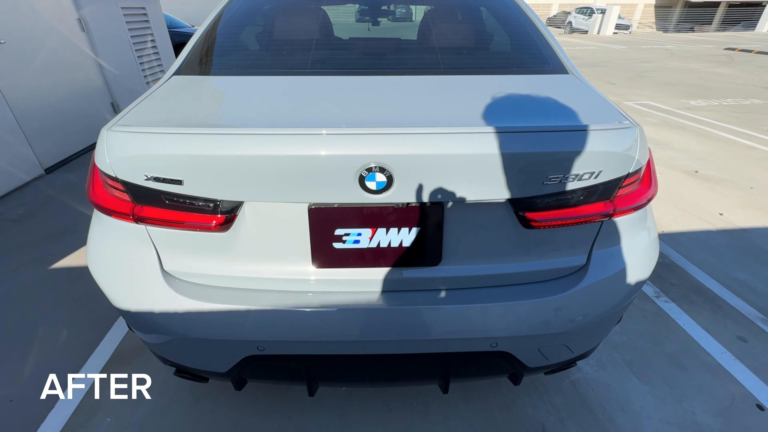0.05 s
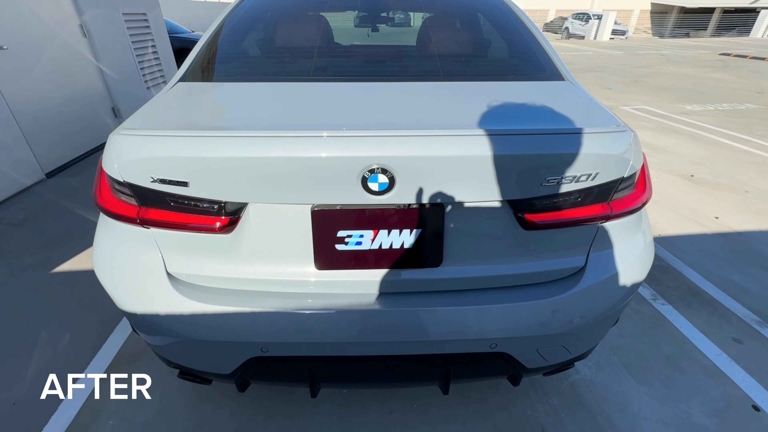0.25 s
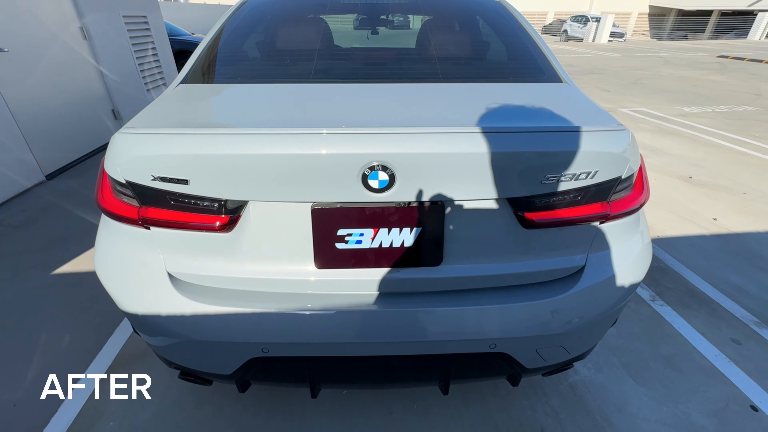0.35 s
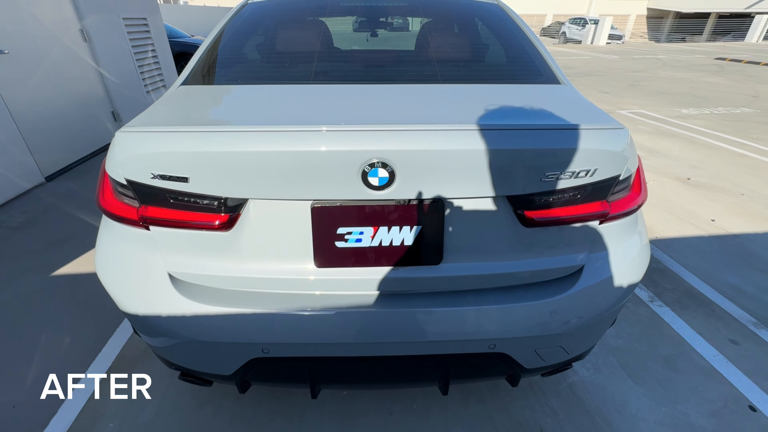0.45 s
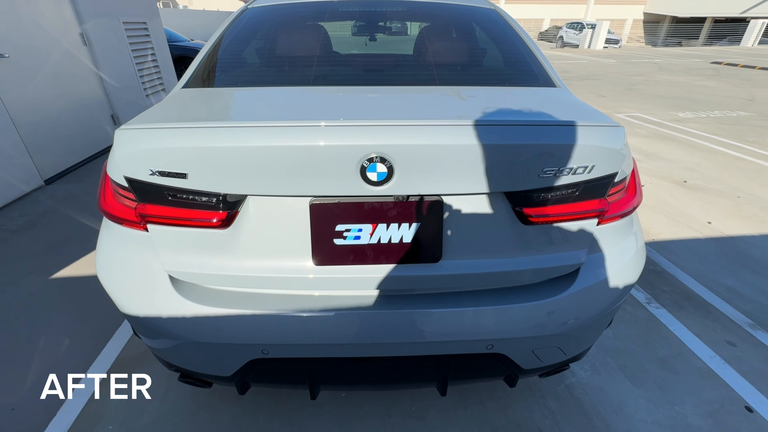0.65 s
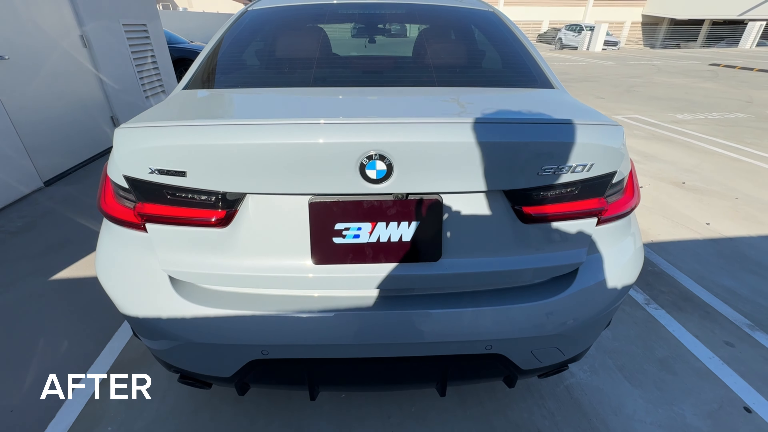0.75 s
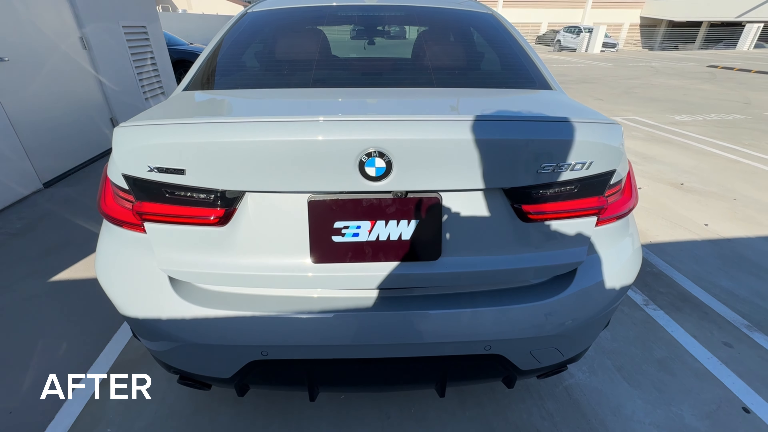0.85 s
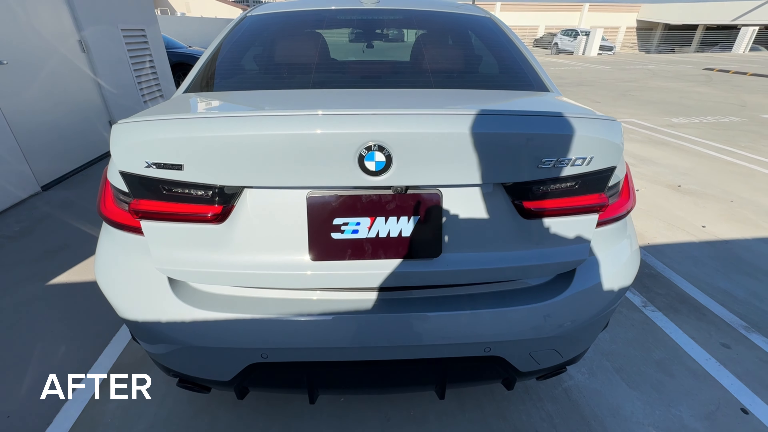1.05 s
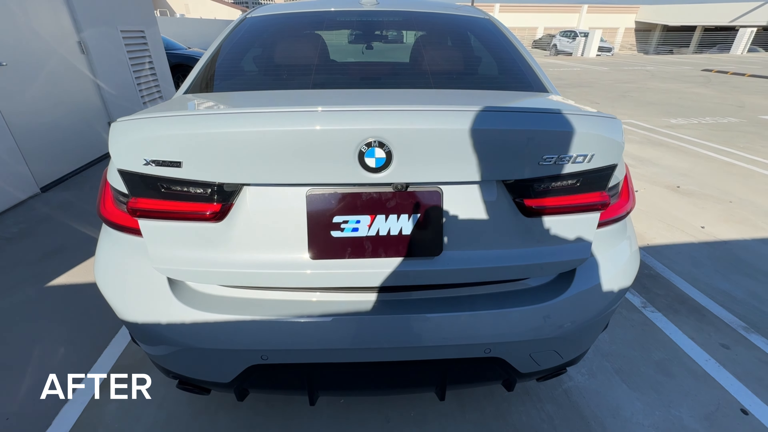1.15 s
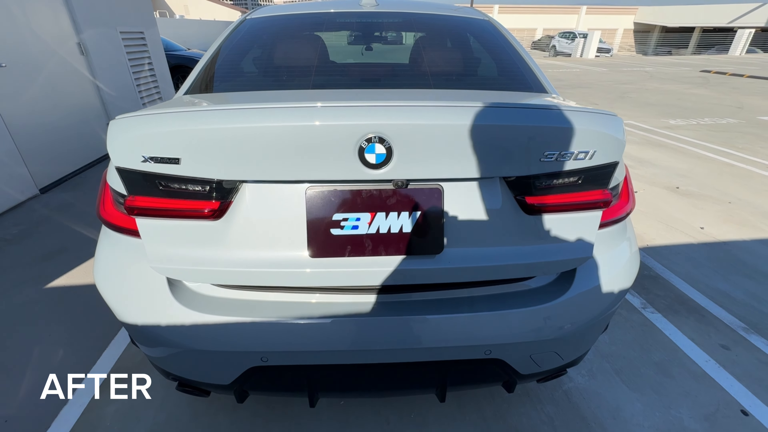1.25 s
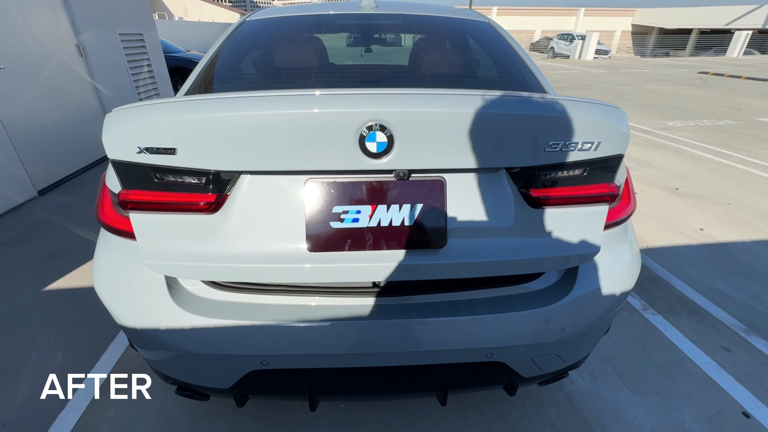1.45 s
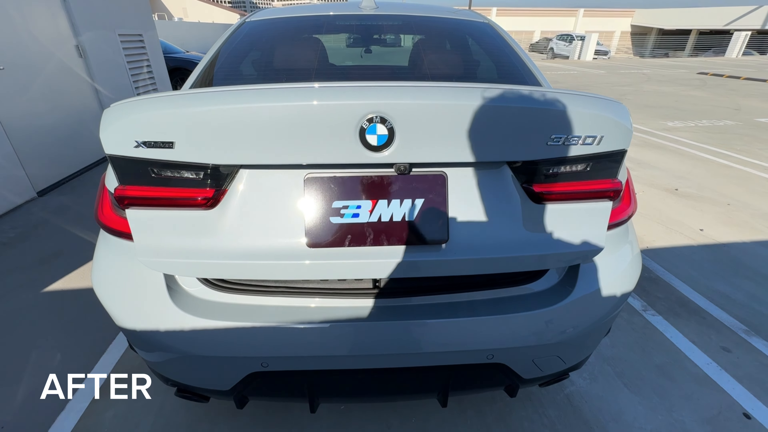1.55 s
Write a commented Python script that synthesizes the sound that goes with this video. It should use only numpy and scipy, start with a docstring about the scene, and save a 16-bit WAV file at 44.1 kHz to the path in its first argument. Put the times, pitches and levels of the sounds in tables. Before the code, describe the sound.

Heard from just behind the car, a trunk pops open with a quick electric whine, a metallic click and a short, hollow boom. Faint, low traffic continues underneath in an outdoor parking lot.

```python
"""Distant traffic rumbles over an open parking lot; then, close by, a car's trunk latch releases.
A small geared actuator whirrs and whines for a tenth of a second, the steel catch clicks free,
the lid knocks and jumps off its seal, and the air in the trunk booms. We stand just behind the car,
with a thin tail coming back from pavement and walls and the traffic bed running underneath."""
import sys
import numpy as np
from scipy import signal
from scipy.fft import rfft, irfft
from scipy.io import wavfile
from scipy.ndimage import uniform_filter1d

SR = 44100
rng = np.random.default_rng(int(sys.argv[2]) if len(sys.argv) > 2 else 0)


def file_out(sig):
    """Save sig as 16-bit WAV at sys.argv[1]."""
    # one column per channel
    cols = np.atleast_2d(sig).T
    # limit, then scale
    lim = np.clip(cols, -1, 1)
    pcm = np.round(lim * 32767).astype(np.int16)
    wavfile.write(sys.argv[1], SR, pcm)


N = 70560
T = np.arange(N) / SR

# how hard the actuator drives its gears (time [s], level [dB])
ACTUATOR_EFFORT = [(.18, -56), (.203, -26), (.215, -30), (.223, -23.5), (.245, -26.5), (.26, -25.5),
                   (.29, -25), (.305, -36), (.335, -84)]
# colour of the gear grit (frequency [Hz], relative level [dB])
GEAR_COLOUR = [(100, -23), (250, -2), (600, -4.5), (1100, -2.5), (1450, -10), (2000, -12.5), (2700, -19),
               (4000, -27.5), (6200, -35), (8000, -34.5), (11000, -40.5), (15000, -61)]
# ring of the latch housing (frequency [Hz], relative level [dB], t60 [s])
HOUSING_MODES = [(888, -11, .09), (1026, 2, .09), (1140, -5, .09), (1238, -9, .1), (1760, -12, .11),
                 (1838, -8, .11), (1968, -8, .1), (2106, -6, .11), (2468, -12, .11), (2772, -19, .11),
                 (3090, -20, .1), (4095, -22, .09)]
# envelope of the motor's note (time [s], level [dB])
WHINE_LEVEL = [(.2, -50), (.221, -26), (.24, -35), (.27, -33), (.283, -26), (.3, -27), (.32, -39),
               (.345, -58)]
# hits of the catch (time [s], level [dB], treble tilt [dB/octave], housing ring [dB], rise [s], t60 [s])
CATCH_CLICKS = [(.193, -47, -3, -50, 0.0097, .08), (.2233, -27.5, 2, -33.5, 0.0011, 0.031),
                (0.2275, -25, -7.5, -31, 0.0011, .056), (0.2346, -42, -14, -37.5, .0005, .015),
                (0.2516, -30, -10.5, -37.5, 0.00055, 0.032), (.2680, -32, 15, -33, 0.00045, 0.017),
                (0.2824, -39.5, 9, -33.5, .0005, .018)]
# colour of steel scraping steel (frequency [Hz], relative level [dB])
SCRAPE_COLOUR = [(500, 8), (2000, -16), (3500, 5.5), (4800, 11), (6300, -5), (7600, 3.5), (9000, -11),
                 (11000, -2), (12700, -3), (13800, -1), (14600, -5), (15600, -22)]
# thin ring of the catch (frequency [Hz], relative level [dB], t60 [s])
CATCH_MODES = [(4130, -20, .03), (4560, -21, .025), (4900, -21, .025), (5330, -21, .025), (7610, -19, .04),
               (8150, -23, .03), (13550, -16, .014), (14150, -17, .014)]
# blows on the lid (time [s], level [dB])
LID_KNOCKS = [(.2194, -18), (.2255, -15), (.2371, -15), (.2715, -29), (.3075, -33)]
# body of the lid (frequency [Hz], relative level [dB], t60 [s])
LID_MODES = [(215, -22, .2), (284, .5, .093), (344, -.5, .045), (538, -20, .14)]
# boom of the air in the trunk (frequency [Hz], relative level [dB], hold [s], t60 [s])
CAVITY_MODES = [(77, 0, .029, .105), (79, -24, .07, .35)]
# length of the lot's tail (frequency [Hz], t60 [s])
LOT_DECAY = [(100, 0.71), (1000, 0.17), (4000, 0.092), (14000, 0.075)]
# colours of the traffic wash, far engines, low rumble and hiss (frequency [Hz], relative level [dB])
WASH_COLOUR = [(25, -54), (100, -5.5), (170, -6.5), (350, -9.5), (560, -12), (850, -1), (1150, -2.5),
               (1500, -10.5), (2200, -16.5), (3400, -33), (4700, -36), (6200, -48), (8000, -53.5),
               (11000, -65), (13000, -70), (15500, -75)]
DRONE_COLOUR = [(30, -15), (100, 0), (122, 4.5), (160, -5), (260, -3), (370, -4), (520, -10), (1500, -98)]
RUMBLE_COLOUR = [(20, -15), (38, -6), (55, 11), (78, 10.5), (105, -4), (180, -29), (500, -53), (2000, -92)]
HISS_COLOUR = [(1500, -39), (4500, -9), (6200, -7), (9000, -2.5), (11000, -9), (12500, -19.5), (15000, -28)]
# fader rides of the same four layers (time [s], level [dB])
WASH_RIDE = [(0, -35), (.4, -35.5), (.55, -35), (.75, -35.3), (.9, -36.5), (1.16, -37), (1.24, -35.5),
             (1.36, -37.5), (1.46, -36.5), (1.6, -37.5)]
DRONE_RIDE = [(0, -54), (.1, -50), (.33, -40), (.48, -46.5), (.75, -41.5), (.95, -43), (1.15, -39.5),
              (1.4, -42.5), (1.6, -43.5)]
RUMBLE_RIDE = [(0, -43), (.08, -55), (.19, -49), (.34, -43), (.43, -48), (.57, -46), (.635, -40.5),
               (.69, -47), (.86, -43.5), (1, -45), (1.11, -40), (1.2, -47), (1.4, -50), (1.6, -47)]
HISS_RIDE = [(0, -64), (.16, -75.5), (.45, -84), (.67, -76.5), (.9, -81.5), (1.6, -84)]
# stereo images of the noise layers (frequency [Hz], left-right correlation [-1 to 1])
WIDE_IMAGE = [(25, 0.86), (70, -0.29), (200, 0.6), (400, 0.43), (700, 0.11), (1200, -0.39), (2500, 0.041),
              (12000, 0.019)]
NARROW_IMAGE = [(30, 0.39), (60, 0.7), (150, 0.97), (400, 0.58)]

ACTUATOR_PAN_DB = 5  # gears, motor and housing sit to the left


def actuator():
    """Uneven gear teeth pulse a gritty whirr and ring the latch housing."""
    teeth_per_s, jitter, pulse_half_width_s, pulse_depth = 127.5, .02, .00098, .3
    effort = gated_level(ACTUATOR_EFFORT)
    tooth_rate = teeth_per_s * (1 + jitter * wobble(200))
    teeth_passed = np.cumsum(tooth_rate * (T > ACTUATOR_EFFORT[0][0])) / SR
    impacts = np.diff(np.floor(teeth_passed), prepend=0) * effort
    tooth_offset_s = ((teeth_passed + .5) % 1 - .5) / teeth_per_s
    pulses = unit(1 - pulse_depth + pulse_depth * np.exp(-(tooth_offset_s / pulse_half_width_s) ** 2))
    grit = pulses * noise(GEAR_COLOUR, grains=chatter()) * effort
    housing = signal.fftconvolve(impacts, ring(HOUSING_MODES, start=0, rise=.0021))[:N]
    return pan(ACTUATOR_PAN_DB) * (amp(-2.5) * grit + amp(-6) * housing / 2)


def motor_whine():
    """The actuator's motor sings one slightly unsteady note that swells twice."""
    pitch_hz, waver = 887, .004
    hz = pitch_hz * (1 + waver * wobble(500))
    return pan(ACTUATOR_PAN_DB) * gated_level(WHINE_LEVEL) * np.sin(2 * np.pi * np.cumsum(hz) / SR)


def catch():
    """The steel catch scrapes, snaps free and rebounds; each click rings the housing."""
    out = np.zeros((2, N))
    for start, db, tilt_db, housing_db, rise, t60 in CATCH_CLICKS:
        envelope = decay(start, rise, t60) + amp(-29) * decay(start, rise, t60=.11)  # snap + soft tail
        scrape = envelope * noise(SCRAPE_COLOUR, tilt_db, grains=chatter())
        ping = amp(-1) * ring(CATCH_MODES, start, rise)
        out += pan(.5) * amp(db) * (scrape + ping)
        out += pan(ACTUATOR_PAN_DB) * amp(housing_db) * ring(HOUSING_MODES, start, rise)
    return out


def chatter():
    """Contact strength between loose steel parts: a steady slide plus a run of tiny uneven ticks."""
    ticks_per_s, tick_decay_s, spread_db, slide = 1000, .0005, 3.3, .65
    contacts = rng.random(N) < ticks_per_s / SR
    strength = amp(spread_db * np.clip(rng.standard_normal(N), -2, 2))
    ticks = signal.lfilter([1], [1, -np.exp(-1 / (tick_decay_s * SR))], contacts * strength)
    return slide + unit(ticks)


def lid_knocks():
    """The freed lid takes three firm knocks, then two faint further knocks."""
    return sum(amp(db) * ring(LID_MODES, start, rise=.0009) for start, db in LID_KNOCKS)


def trunk_boom():
    """The lid jumps off its seal and pumps the air in the trunk: a short, deep boom."""
    start_s, rise_s = .228, .0055
    boom = sum(amp(db) * decay(start_s, rise_s, t60, hold) * np.sin(2 * np.pi * hz * (T - start_s))
               for hz, db, hold, t60 in CAVITY_MODES)
    return amp(-15.5) * boom


def lot_reflections(send):
    """Pavement and nearby walls return a thin diffuse tail that lingers longest in the bass."""
    predelay_s = .009
    hz, t, bands = signal.stft(rng.standard_normal((2, SR // 2)), SR, nperseg=256)
    fade = 1000. ** (-t / curve_at(LOT_DECAY, hz)[:, None])
    tail = signal.istft(bands * fade, SR, nperseg=256)[1]
    tail = np.pad(tail / np.linalg.norm(tail[0]), ((0, 0), (int(predelay_s * SR), 0)))
    return signal.fftconvolve(send, tail, axes=1)[:, :N]


def traffic_bed():
    """Distant traffic: a gently flickering wash, low rumble, far engines droning and a faint hiss."""
    flicker_db = 1.4
    bands = signal.stft(noise(WASH_COLOUR), nperseg=1024)[2]
    flicker = uniform_filter1d(rng.standard_normal(bands.shape[1:]), size=4, axis=0)  # across frequency
    flicker = unit(uniform_filter1d(flicker, size=6, axis=1))  # across time
    wash = unit(signal.istft(bands * amp(flicker_db * flicker), nperseg=1024)[1][:, :N])
    rumble = pan(3.5) * noise(RUMBLE_COLOUR, image=NARROW_IMAGE) * level(RUMBLE_RIDE)
    drone = noise(DRONE_COLOUR, image=NARROW_IMAGE) * level(DRONE_RIDE)
    hiss = noise(HISS_COLOUR) * level(HISS_RIDE)
    return pan(1.47) * wash * level(WASH_RIDE) + rumble + drone + hiss


def amp(db):
    """Decibels to gain."""
    return 10 ** (np.asarray(db) / 20)


def unit(x):
    """Scales to rms 1."""
    return x / np.sqrt(np.mean(x ** 2) + 1e-20)


def pan(db):
    """Stereo gains that put the left channel db above the right."""
    return amp(np.array([[db], [-db]]) / 2)


def curve_at(points, hz):
    """Reads a table on a log-frequency axis."""
    frequencies, values = np.transpose(points)
    return np.interp(np.log(hz + 1), np.log(frequencies), values)


def level(points):
    """Gain over time from a table of decibels."""
    return amp(np.interp(T, *np.transpose(points)))


def gated_level(points):
    """Gain over time, muted outside the table's span."""
    return level(points) * (T > points[0][0]) * (T < points[-1][0])


def wobble(samples):
    """Random drift of rms 1, smoothed over so many samples."""
    return unit(uniform_filter1d(rng.standard_normal(N), size=samples))


def noise(colour, tilt_db=0, image=WIDE_IMAGE, grains=1):
    """Coloured stereo noise of rms 1; image sets its width and grains break it into ticks."""
    hz = np.fft.rfftfreq(N, 1 / SR)
    left, independent = rfft(rng.standard_normal((2, N)) * grains)
    correlation = np.clip(curve_at(image, hz), -1, 1)
    right = correlation * left + np.sqrt(1 - correlation ** 2) * independent
    eq = amp(curve_at(colour, hz) + tilt_db * np.log2(hz / 1000 + 1))
    return unit(irfft(np.array([left, right]) * eq, N))


def decay(start, rise, t60, hold=0):
    """Attack, hold and exponential release, all in seconds."""
    t = np.maximum(T - start, 0)
    return (1 - np.exp(-t / rise)) * 1000. ** (-np.maximum(t - hold, 0) / t60)


def ring(modes, start, rise):
    """The modes of a part struck once."""
    return sum(amp(db) * decay(start, rise, t60) * np.sin(2 * np.pi * hz * (T - start))
               for hz, db, t60 in modes)


def scene():
    """Latch and lid up front, a light tail from the lot, traffic behind."""
    latch = actuator() + catch()
    whine = motor_whine()
    body = lid_knocks() + trunk_boom()
    tail = amp(-9) * lot_reflections(latch + amp(-12) * body)
    return latch + whine + body + tail + traffic_bed()


def record(dry):
    """A low cut under 25 Hz and a steep roll-off at the very top."""
    low_cut_hz, high_cut_hz = 25, 15750
    low_cut = signal.butter(2, low_cut_hz, "high", fs=SR, output="sos")
    high_cut = signal.firwin(511, high_cut_hz, window=("kaiser", 9), fs=SR)
    return signal.oaconvolve(signal.sosfilt(low_cut, dry), high_cut[None], "same")


dry = scene()
out = record(dry)
file_out(out)
```